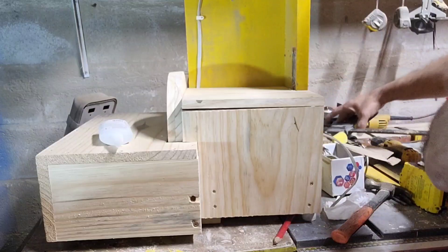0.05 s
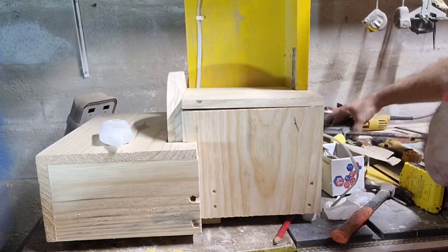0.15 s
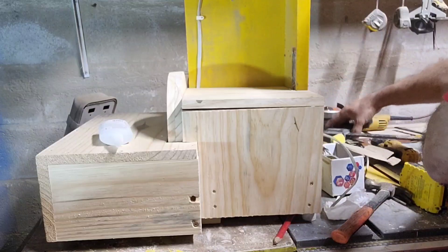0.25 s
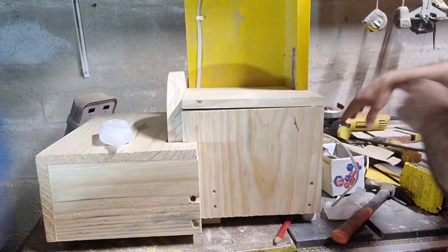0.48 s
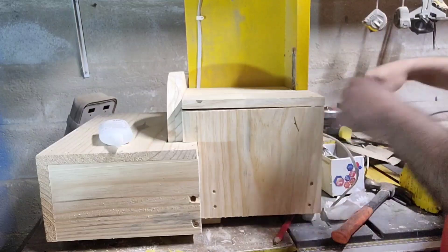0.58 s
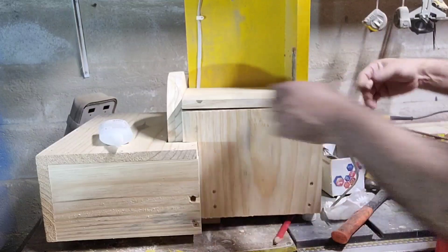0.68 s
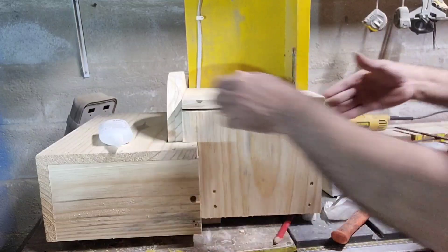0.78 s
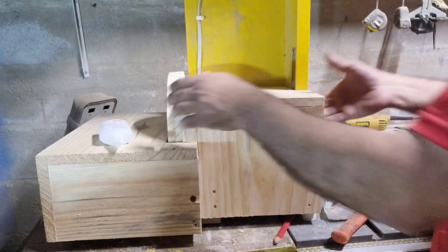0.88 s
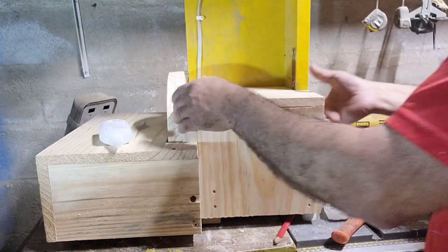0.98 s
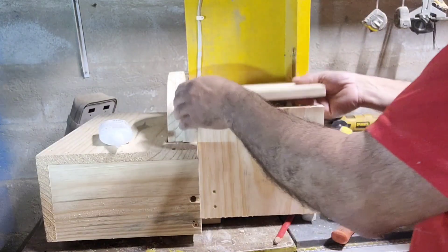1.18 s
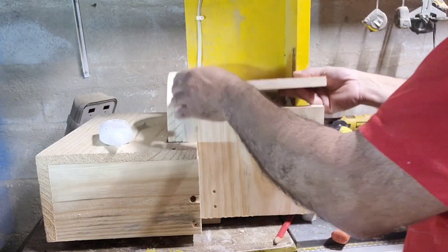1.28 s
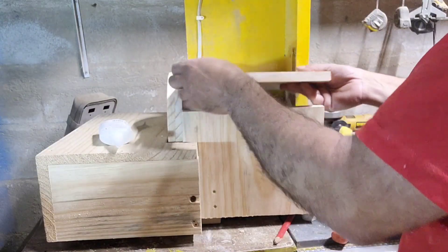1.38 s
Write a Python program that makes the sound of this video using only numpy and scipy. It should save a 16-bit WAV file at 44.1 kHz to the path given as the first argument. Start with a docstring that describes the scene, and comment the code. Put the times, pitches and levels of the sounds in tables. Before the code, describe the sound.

A hand tool is shuffled on a wooden workbench, knocks lightly and lands with a sharp clack. A wooden box lid then thumps hollowly and rubs as it is lifted, heard close in a small, slightly boomy workshop.

```python
"""Tool and pine box at the workbench

A small, hard workshop with a bass boom; a stereo pair close to the bench, the right microphone dull.
A hand tool is shuffled and put down on the cluttered wooden top: two light knocks, then a sharp clack.
Hands then grip the lid of a pine box, which thumps hollowly and rubs on the box as it is lifted."""
import sys
import numpy as np
from scipy import signal
from scipy.fft import rfft, irfft, next_fast_len
from scipy.io import wavfile
from scipy.ndimage import map_coordinates

SR = 44100
rng = np.random.default_rng(int(sys.argv[2]) if len(sys.argv) > 2 else 0)


def materialize(psi):
    """Save the field psi as 16-bit PCM at rate SR to the path in sys.argv[1].

    A 1-D psi becomes a single channel; in a 2-D psi each row is a channel.
    """
    bounded = np.clip(np.atleast_2d(psi).T, -1, 1)
    quanta = np.round(bounded * 32767).astype(np.int16)
    wavfile.write(sys.argv[1], SR, quanta)


N = 63945
T = np.arange(N) / SR
HZ = np.fft.rfftfreq(2 * next_fast_len(N), 1 / SR)

# modes of the pine box: f/Hz, level/dB, t60/s
BOX_MODES = [(226, -9, 0.06), (261.1, -1.5, 0.27), (361.4, -1, 0.16), (481.6, -0.5, 0.11),
             (520, -0.5, 0.085), (573.6, -3.5, 0.12), (673.4, -6.5, 0.5), (739.4, -1.5, 0.064),
             (875, -10.5, 0.05), (1032, -7, 0.045)]


def amp(db):
    """Decibels to gain."""
    return 10 ** (np.asarray(db) / 20)


def unit(x):
    """Scale to rms 1."""
    return x / np.sqrt(np.mean(x ** 2) + 1e-20)


def along(points, hz=HZ):
    """Join (f/Hz, value) points on a log frequency axis."""
    f, v = np.transpose(points)
    return np.interp(np.log(hz + 1), np.log(f + 1), v)


def filtered(x, response):
    """Apply a frequency response given on the HZ grid."""
    return irfft(rfft(x, 2 * len(HZ) - 2) * response)[..., :N]


def causal(gain):
    """Minimum-phase response with this gain, by folding the cepstrum."""
    cepstrum = irfft(np.log(np.maximum(gain, 1e-6)))
    cepstrum[1:len(HZ) - 1] *= 2
    cepstrum[len(HZ):] = 0
    return np.exp(rfft(cepstrum))


def low_cut(hz):
    """Response of a fourth-order high-pass."""
    return causal((1 + (hz / (HZ + 1)) ** 8) ** -.5)


def resonance(hz, width_hz):
    """Band-pass response of one resonance."""
    return 1j * HZ * width_hz / (hz * hz - HZ * HZ + 1j * HZ * width_hz)


def contact(x, s, bright_hz, order=5):
    """Start a sound at time s; a softer contact passes less treble."""
    softness = causal((1 + (HZ / bright_hz) ** order) ** -.5)
    return filtered(x, softness * np.exp(-2j * np.pi * HZ * s))


def ring(partials, ratio=1, sign=-1, scatter_db=1.5, longest_t60=.26):
    """Damped sines, varied on every blow; of alternating sign they bloom, of like sign they snap."""
    out = np.zeros(N)
    for k, (hz, db, t60) in enumerate(partials):
        decay = amp(db + scatter_db * rng.standard_normal() - 60 * T / min(t60, longest_t60))
        out += sign ** k * decay * np.sin(2 * np.pi * hz * ratio * T)
    return out


def burst(t60):
    """Dying noise of energy 1."""
    noise = rng.standard_normal(N) * amp(-60 * T / t60)
    return noise / np.linalg.norm(noise)


def friction(s, rise, length, colour, grain_db=3.5, grains_per_s=190, release_s=.024):
    """Grainy stick and slip under one stroke, coloured by the wood."""
    roughness = np.interp(T * grains_per_s, np.arange(N), rng.standard_normal(N))
    grains = rng.standard_normal(N) * amp(grain_db * roughness)
    pressure = np.clip((T - s) / rise, 0, 1) * np.exp(-np.maximum(T - s - length, 0) / release_s)
    return pressure * unit(filtered(grains, colour))


def spread(pair):
    """Two unrelated noises as a diffuse field at the microphones, alike in the bass."""
    # likeness of left and right: f/Hz, correlation
    likeness = [(100, 0.78), (250, 1), (500, 0.53), (1000, 0.033), (3000, 0.059)]
    angle = np.arccos(np.clip(along(likeness), -1, 1)) / 2
    mid, side = filtered(pair, np.array([np.cos(angle), np.sin(angle)]))
    return np.array([mid + side, mid - side])


def workshop(x, wet_db, left_lead_ms, wall_s=.0085, wall_db=-17.5, build_s=.0032):
    """What reaches the pair: direct sound, a slap off the wall behind the bench and a diffuse tail."""
    # reverberation time of the room: f/Hz, t60/s
    room_t60 = [(100, 0.32), (260, 0.3974), (700, 0.36), (1800, 0.4), (4800, 0.3269), (13000, 0.2939)]
    # colour of the tail: f/Hz, level/dB
    tail_colour = [(100, -3), (300, 2.5), (600, 2), (2000, 1.5), (10000, 0)]
    hz, t, noise = signal.stft(rng.standard_normal((2, N)), SR, nperseg=256)
    decay = amp(-60 * t / along(room_t60, hz)[:, None])
    tail = signal.istft(noise * decay, SR, nperseg=256)[1][:, :N]
    build = 1 - np.exp(-(T / build_s) ** 2)
    tail = spread(unit(tail * build)) / np.sqrt(N)
    diffuse = amp(wet_db + along(tail_colour)) * rfft(tail, 2 * len(HZ) - 2)
    near = 1 + amp(wall_db) * np.exp(-2j * np.pi * HZ * wall_s)
    mic_delays = np.exp(1j * np.pi * HZ * left_lead_ms / 1000 * np.array([[1], [-1]]))
    return filtered(x, mic_delays * (near + diffuse))


def room_tone(level_db=-65):
    """The quiet air of the workshop: diffuse noise, mostly bass."""
    # spectrum of the air: f/Hz, level/dB
    air = [(25, -23), (110, 8.5), (400, -0.5), (1000, -26), (4000, -27), (9000, -29), (15000, -21)]
    return amp(level_db) * unit(filtered(spread(rng.standard_normal((2, N))), amp(along(air))))


def tool_slides():
    """The tool drags over the bench: a scrape on top, a rumble in the boards."""
    # strokes of the tool: t/s, rise/s, length/s, level/dB, rumble re scrape/dB
    strokes = [(-.01, 0.0041, 0.046, -49, 7.5), (0.11, 0.0027, 0.16, -59.5, 3),
               (0.316, 0.0048, 0.16, -50, 9), (0.552, 0.008, 0.04, -49, -5), (0.587, 0.007, 0.036, -62, 18)]
    # spectrum of the scrape: f/Hz, level/dB
    scrape = [(200, -11), (700, -2.5), (1500, 0), (2300, -3), (3000, -9), (4800, -10), (7500, -20.5),
              (8500, -25.5), (15000, -22)]
    # spectrum of the boards: f/Hz, level/dB
    rumble = [(50, -17), (120, -0.5), (280, 0.5), (400, -1.5), (520, -8), (800, -16), (1500, -46)]
    drag = np.zeros(N)
    for s, rise, length, db, rumble_db in strokes:
        drag += amp(db) * friction(s, rise, length, amp(along(scrape)))
        drag += amp(db + rumble_db) * friction(s, rise, length, amp(along(rumble)))
    return workshop(drag, wet_db=-7, left_lead_ms=0)


def tool_knocks(ring_db=-31, noise_db=7.5, clatter_db=-3, frame_trim_db=-35.5):
    """Each blow snaps the bench top, cracks, rattles the clutter, rings tool and frame, and booms."""
    # blows of the tool: t/s, level/dB, brightness/Hz, bite of crack and ring/dB, frame/dB, boom/dB
    knocks = [(.002, -28.5, 880, -5, -10.5, -8.5), (.012, -27.5, 700, -9, -17.5, -19.5),
              (0.032, -28.5, 514, -4, -17, -29), (0.051, -25, 600, -5.5, -20, -22.5),
              (0.103, -34, 400, -3, -18, -21), (0.1977, -18.5, 2260, -2.5, 3, -7),
              (0.299, -11.5, 2600, -4, 2.5, -2.5), (0.3646, 1, 15000, 3.5, -2.5, 0),
              (0.3737, -4, 15000, -0.5, 1, -3.5), (0.385, -16.5, 14000, -5, -9.5, -10),
              (.559, -29.5, 1760, 4.5, -28, -18), (0.59, -35.5, 3000, -9, -11, -14)]
    # ringing peaks of the clack on the bench top: f/Hz, level/dB, t60/s
    clack_peaks = [(233, -1, 0.16), (727, -3, .12), (843, -4, .1), (914, -2, .09), (1020, -2, .12),
                   (1126, -3, .12), (1245, 0, .11), (1384, -1, .11), (1483, -5, .08), (1775, -3, .07),
                   (2042, -2, .08), (2162, 0, .07), (2282, 4, .08)]
    # modes of the bench frame: f/Hz, level/dB, t60/s (capped in ring)
    frame_modes = [(222.9, -1, 0.12), (270.1, -2, 0.28), (304.2, -10.5, 0.5), (365.4, -8.5, 0.18),
                   (381, -7.5, 0.3), (491, -0.5, 0.063), (566, -6.5, 0.13), (660, -9, 0.18)]
    # partials of the steel tool: f/Hz, level/dB
    steel_partials = [(3330, -9), (4200, -7), (6000, -15), (7400, -15), (7700, -13)]
    # spectrum of crack and clatter: f/Hz, level/dB
    crack_spectrum = [(60, -27.5), (200, -12), (480, -11.5), (720, -0.5), (1400, -2), (1750, -6.5),
                      (2300, -3.5), (2650, -7), (4200, -10.5), (7700, -13), (8500, -21), (16000, -21.5)]
    steel_t60 = .11
    steel_modes = [(hz, db, steel_t60) for hz, db in steel_partials]
    colour = causal(unit(amp(along(crack_spectrum))))
    out = np.zeros((2, N))
    for s, db, bright_hz, bite_db, frame_db, boom_db in knocks:
        snap = amp(db + ring_db + bite_db) * (ring(clack_peaks, sign=1) + ring(steel_modes))
        crack = amp(bite_db) * burst(t60=.0054)
        clatter = amp(clatter_db) * burst(t60=.091)
        frame = amp(frame_trim_db + frame_db) * ring(frame_modes)
        blow = amp(db + noise_db) * filtered(crack + clatter, colour) + frame
        out += workshop(contact(snap, s, bright_hz, order=10), wet_db=-9.5, left_lead_ms=.15)
        out += workshop(contact(blow, s, bright_hz, order=10), wet_db=-1, left_lead_ms=-.099)
        out += amp(boom_db) * boom(s, bright_hz)
    return out


def boom(s, bright_hz, trim_db=-34, build_s=.034, waver_rad=.24, wavers_per_s=19):
    """The bass of bench and room builds up after a blow and lingers, wavering."""
    # low modes of the bench in the room: f/Hz, level/dB, t60/s
    low_modes = [(59, -11.5, 1), (79.9, -6, 0.52), (114.95, -1, 0.71), (146.3, -0.5, 0.94),
                 (178.5, 2, 0.51)]
    bass = np.zeros(N)
    for hz, db, t60 in low_modes:
        waver = waver_rad * map_coordinates(rng.standard_normal(2048), [T * wavers_per_s])
        bass += amp(db - 60 * T / t60) * np.sin(2 * np.pi * hz * T + waver)
    swell = bass * (1 - np.exp(-T / build_s))
    return amp(trim_db) * workshop(contact(swell, s, bright_hz), wet_db=-4.5, left_lead_ms=.13)


def lid_rubs(body_low_hz=130, body_high_hz=890, squeak_width_share=.06):
    """Wood on wood: a hiss in the lid's resonances, the hollow box below it and a faint squeak."""
    # strokes of the lid: t/s, rise/s, length/s, level/dB, body re hiss/dB, squeak/Hz, squeak re hiss/dB
    strokes = [(0.772, 0.031, 0.049, -80.5, 21, 2480, -28), (0.813, 0.019, 0.032, -60, 24, 1876, -2.5),
               (0.855, 0.01, 0.071, -61, 12, 2530, -1), (0.877, 0.015, 0.097, -72.5, 7, 3500, -3.5),
               (1.065, 0.023, 0.04, -74, 8.5, 4350, 0), (1.13, 0.059, 0.072, -56, 8.5, 1377, -3.5),
               (1.264, 0.029, 0.03, -70, 6.5, 4094, -12), (1.368, 0.022, 0.071, -57, 7, 1355, -1.5),
               (1.379, 0.012, 0.053, -63.5, 1.5, 581, 17), (1.411, 0.027, 0.042, -51, -5.5, 1621, -6)]
    # spectrum of the rubbing: f/Hz, level/dB
    rub_spectrum = [(200, -1), (700, -15.5), (1000, -1), (1500, 5), (2400, -1.5), (4200, -5), (7500, -10.5),
                    (8500, -21), (10500, -11), (15500, -17)]
    # resonances of the lid: f/Hz, width/Hz, level/dB
    lid_modes = [(790, 49, 12), (1310, 96, -19), (2250, 170, -0.5), (3310, 105, 10), (4080, 200, 8),
                 (5620, 190, 0)]
    lid = sum(amp(db) * resonance(hz, width) for hz, width, db in lid_modes)
    hiss = amp(along(rub_spectrum)) * (1 + lid)
    body = sum((-1) ** k * amp(db) * resonance(hz, width_hz=45)
               for k, (hz, db, _) in enumerate(BOX_MODES))
    body = body / (1 + (HZ / body_high_hz) ** 4) / (1 + (body_low_hz / (HZ + 1)) ** 4)
    out = np.zeros(N)
    for s, rise, length, db, body_db, squeak_hz, squeak_db in strokes:
        squeak = resonance(squeak_hz, squeak_width_share * squeak_hz) ** 2
        for part_db, colour in [(0, hiss), (body_db, body), (squeak_db, squeak)]:
            out += amp(db + part_db) * friction(s, rise, length, colour)
    return workshop(out, wet_db=-7.5, left_lead_ms=.13)


def lid_thumps(thud_db=-5, ring_db=-31.5, boom_db=-20.5, radiates_hz=221):
    """A soft push on the pine box and its hollow ring, higher, thinner and shorter under the hand."""
    # lid against the box: t/s, level/dB, brightness/Hz, pitch ratio, ring length ratio
    thumps = [(0.813, -14, 407, 0.45, 3.17), (0.8249, -1.5, 1090, 0.92, 0.81), (0.8396, -2, 1140, 1, 0.75),
              (.869, -10.5, 1200, 1.4, 0.71), (1.1325, -1, 503, 1.25, 0.32), (1.142, -5.5, 411, 1.1, 0.64),
              (1.3895, -9.5, 563, 1.2, 1.86), (1.417, -10, 710, 0.74, 0.97)]
    # spectrum of the push: f/Hz, level/dB
    thud_spectrum = [(50, -53), (180, 1.5), (300, 3.5), (500, 7), (750, -12.5), (1200, -21.5),
                     (3000, -12.5), (10000, -50)]
    thud = amp(thud_db) * irfft(causal(unit(amp(along(thud_spectrum)))))[:N]
    out = np.zeros((2, N))
    for s, db, bright_hz, pitch, sustain in thumps:
        modes = [(hz, level, t60 * sustain) for hz, level, t60 in BOX_MODES]
        hollow = amp(ring_db) * ring(modes, pitch, longest_t60=.15)
        radiated = filtered(thud + hollow, low_cut(radiates_hz * pitch))  # a small box gives little bass
        out += amp(db) * workshop(contact(radiated, s, bright_hz), wet_db=-7.5, left_lead_ms=.27)
        out += amp(db + boom_db) * sustain ** 2 * boom(s, bright_hz)
    return out


def scene():
    """Room tone, tool and lid as they arrive at the pair."""
    return room_tone() + tool_knocks() + tool_slides() + lid_thumps() + lid_rubs()


def record(dry, low_cut_hz=50, ceiling=.95, top_hz=16100):
    """The right microphone is dull; deep bass is cut, peaks are rounded and the top is band-limited."""
    # response of the right microphone: f/Hz, level/dB
    right_mic = [(100, 2.3), (500, 1.5), (1200, -3), (2200, -6.5), (3500, -16.5), (6000, -21.5),
                 (9000, -23.5), (14000, -8.5)]
    pair = np.array([dry[0], filtered(dry[1], amp(along(right_mic)))])
    pair = filtered(pair, low_cut(low_cut_hz))
    rounded = pair / (1 + np.abs(pair / ceiling) ** 4) ** .25
    return filtered(rounded, 1 / (1 + (HZ / top_hz) ** 160))


dry = scene()
out = record(dry)
materialize(out)
```